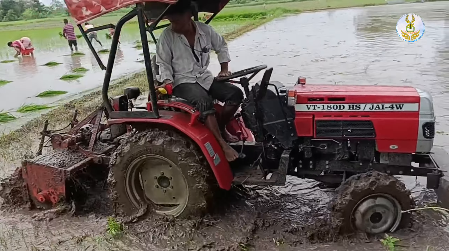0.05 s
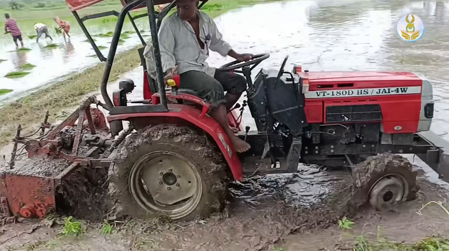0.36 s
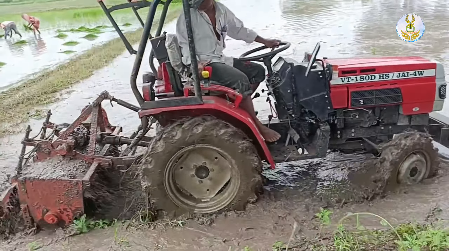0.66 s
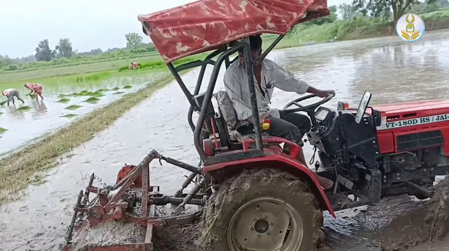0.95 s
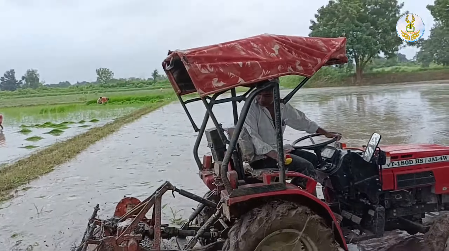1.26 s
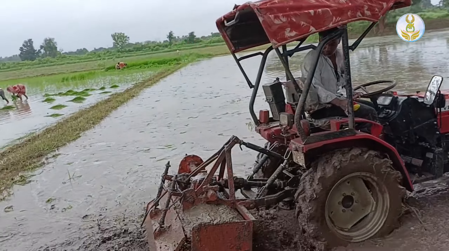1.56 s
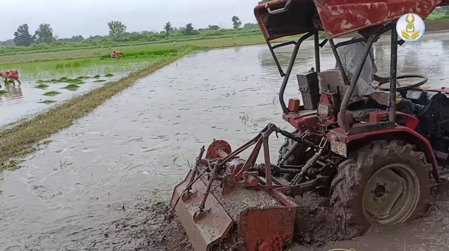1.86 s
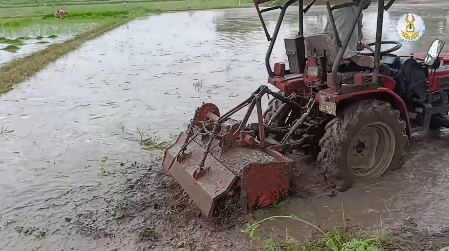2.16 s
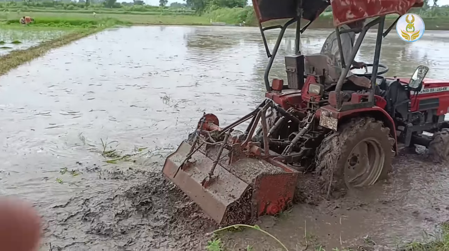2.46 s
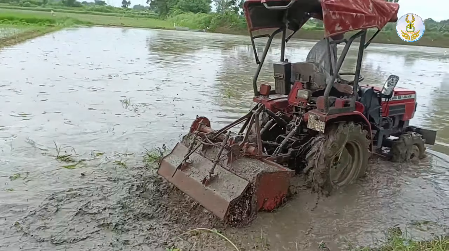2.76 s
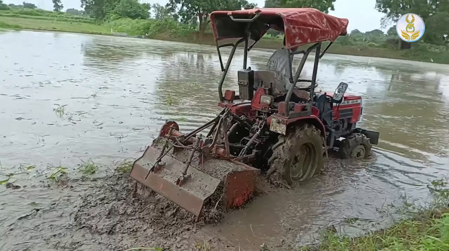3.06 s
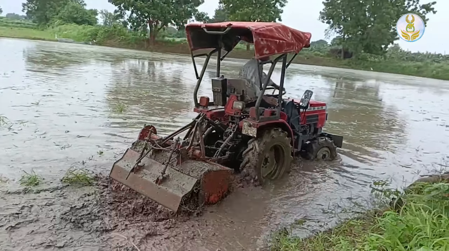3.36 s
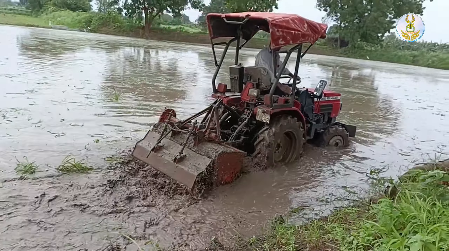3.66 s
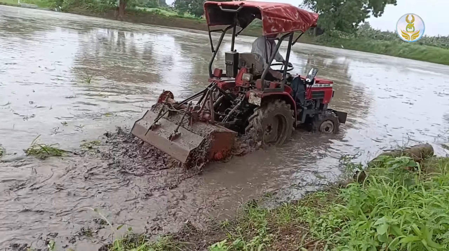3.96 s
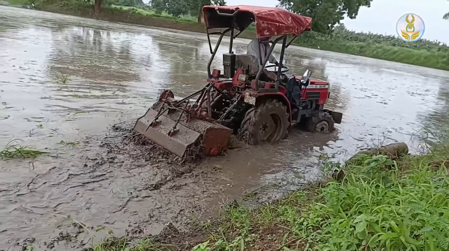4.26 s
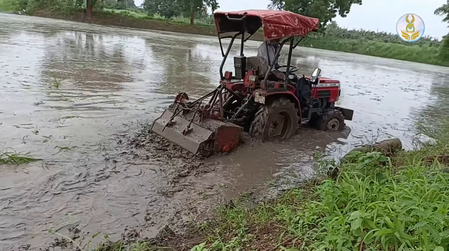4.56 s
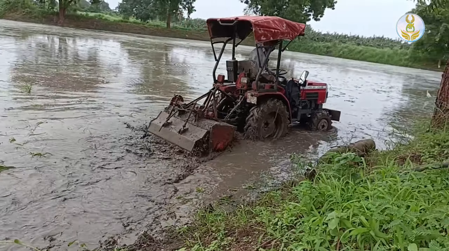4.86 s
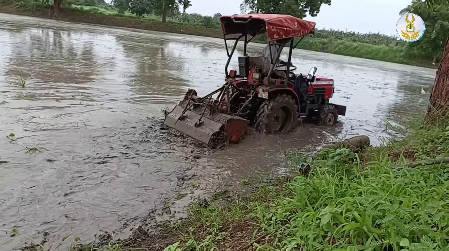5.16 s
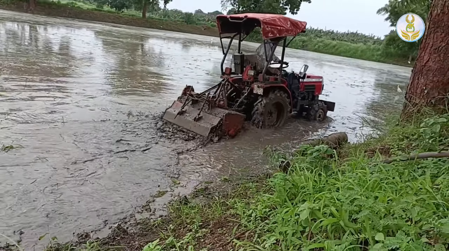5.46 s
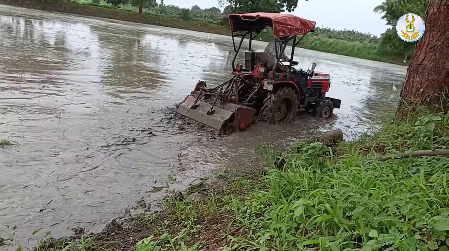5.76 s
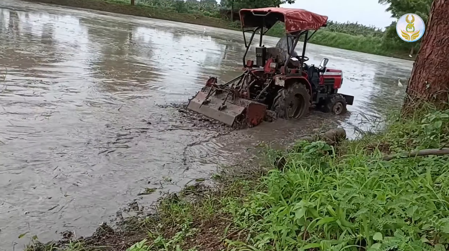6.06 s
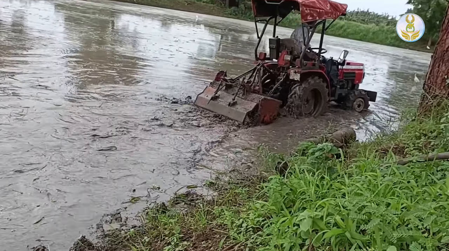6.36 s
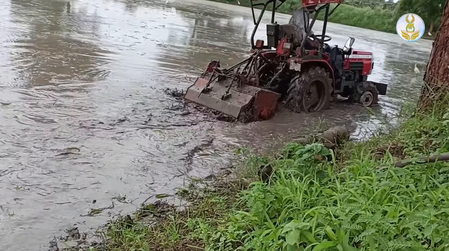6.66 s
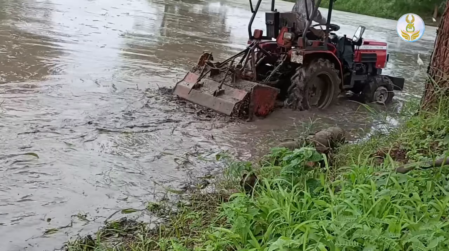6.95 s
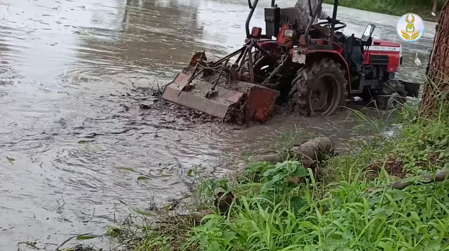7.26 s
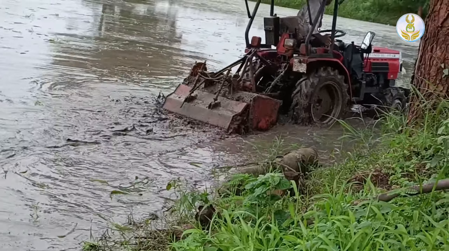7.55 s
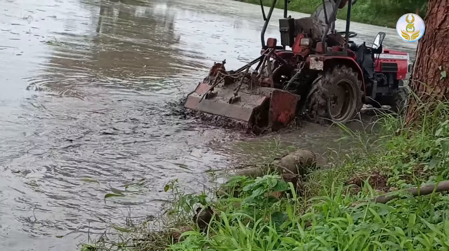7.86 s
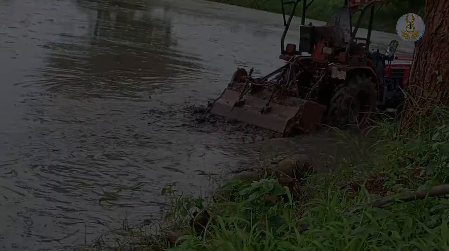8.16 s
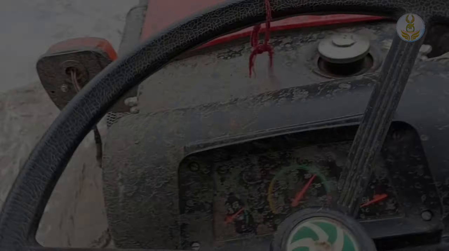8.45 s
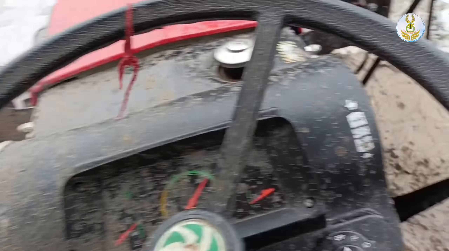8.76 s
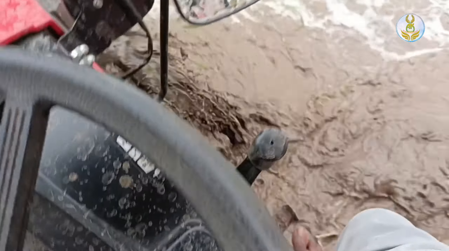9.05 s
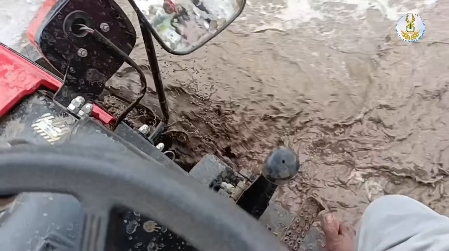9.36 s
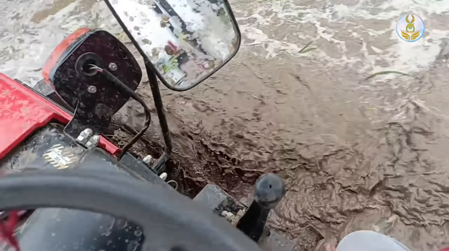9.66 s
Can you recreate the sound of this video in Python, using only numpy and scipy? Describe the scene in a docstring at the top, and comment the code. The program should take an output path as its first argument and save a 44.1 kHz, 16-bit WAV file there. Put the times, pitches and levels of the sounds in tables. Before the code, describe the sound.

A small diesel tractor chugs through wet mud pulling a tiller and moves away, then its engine runs louder and faster up close.

```python
"""A small diesel tractor drags a rotary tiller through a flooded field, passes close by and moves away. Its
exhaust thumps unevenly under load, each puff ringing the pipe and silencer over the engine's clatter. The
blades churn mud and fling grit against their hood, narrow bands of noise swell and fade, and light gusts
rumble. Then the scene changes to the driver's seat, where the engine runs faster, the bonnet drones and the
valves tick."""
import sys
import numpy as np
from scipy import signal
from scipy.fft import rfft, irfft, next_fast_len
from scipy.io import wavfile
from scipy.ndimage import uniform_filter1d, minimum_filter1d, map_coordinates

SR = 44100
rng = np.random.default_rng(int(sys.argv[2]) if len(sys.argv) > 2 else 0)


def put_to_file(sound):
    """Save the sound as 16-bit audio at rate SR, in the file named by the first command-line argument."""
    columns = np.atleast_2d(sound).T  # one column per channel
    safe = np.clip(columns, -1, 1)
    whole_steps = np.round(safe * 32767)
    wavfile.write(sys.argv[1], SR, whole_steps.astype(np.int16))


N = 433062
T = np.arange(N) / SR

FIELD_END_S, SEAT_START_S = 8.342, 8.410
PASS_S, PASS_M, DRIVE_M_PER_S = 0.55, 2.78, 1.0  # closest point of a straight drive past
TURN_START_S, TURN_END_S = 2.9, 5.04  # the tractor turns its tail to us
BEHIND_BANK_S = 6.94  # from here on it slips behind the grassy bank

# Stereo width. Each row: frequency in Hz, left-right likeness from -1 to 1.
STEREO_LIKENESS = [(30, -0.5), (100, 1), (300, 0.58), (600, 0.86), (1100, 0.37), (2200, 0), (5000, 0)]
# Stereo lean on the bank and at the seat. Each row: frequency in Hz, left minus right in dB.
FIELD_LEAN = [(60, 2), (250, 0), (1800, -2.5), (3600, -6), (6400, -2), (8500, 14.5), (10500, -0.5),
              (12500, -4), (15000, -13)]
SEAT_LEAN = [(300, 0), (2700, -1.5), (4200, 3), (6400, 17), (9800, 16), (15000, 2)]
# How each named part carries. Each row: metres behind the engine, base level at the closest point in dB,
# dB lost per doubling of distance, dB gained from behind, dB lost per second behind the bank.
PART_CARRY = {"pipe": (-0.5, -17.5, 3.5, 0, 0.5), "silencer": (0, -17.5, 6, -1, -2),
              "clatter": (1, -25.5, 3.5, 1, 3.5), "slosh": (-0.4, -20.5, 1.5, -12.5, 0.5),
              "spray": (1.6, -30.5, 3.5, -5, 0.5), "hood": (0, -35, 4, 8.5, 6)}

# Colours of the noise layers. Each row: frequency in Hz, relative level in dB.
WIND_SPECTRUM = [(10, -6), (36, -10), (80, -1.5), (250, -11.5), (1500, -95)]
SLOSH_SPECTRUM = [(500, -3), (1200, -6), (1750, -1.5), (2100, -0.5), (2700, -0.5), (3300, 1.5),
                  (4000, -0.5), (4600, -6.5), (5500, -8.5), (6300, -19.5), (7100, -26), (10000, -58)]
SPRAY_SPECTRUM = [(4000, -12), (6000, -1.5), (7100, -8.5), (7700, -3), (9500, -2.5), (10400, -5),
                  (11500, -1), (13000, -2.5), (14500, -6.5), (16000, -8)]
CLATTER_SPECTRUM = [(200, -12), (350, -12), (410, -26), (465, -1), (540, 2.5), (700, 4), (820, -0.5),
                    (1000, 0), (1450, -2.5), (2000, -14.5), (9000, -69)]
SEAT_KNOCK_SPECTRUM = [(25, -1), (70, -4), (180, 5.5), (360, 9.5), (570, -1), (690, 3.5), (800, 0.5),
                       (900, 3.5), (1000, -3), (1250, 0), (1550, -6.5), (1900, 1.5), (2800, -4),
                       (3600, -19), (7000, -71)]
SEAT_TREBLE_SPECTRUM = [(1650, -15.5), (2800, -5.5), (3300, -2.5), (3700, -7.5), (5500, -12.5),
                        (6950, -20.5), (7800, -16), (12200, -24), (15500, -36)]

# Gusts on the microphone. Each row: peak time in seconds, swell time in seconds, level in dB.
WIND_GUSTS = [(0.1, 0.61, -19.5), (1.6, 2.5, -23), (7.33, 0.068, -19.5), (8.1, .06, -21)]
# Narrow bands of noise. Each row: peak time and swell time in seconds, centre and nominal width in Hz,
# level in dB.
RESONANT_BANDS = [(0, 1.8, 1123, 59, -28.5), (5, 0.3, 319, 9.6, -21), (6, 1.1, 332, 27, -31.5),
                  (4, 0.83, 1725, 100, -35.5)]
# Level rides. Each row: peak time in seconds, swell time in seconds, boost or cut in dB.
SPRAY_SWELLS = [(1.65, .35, 2), (3.3, .25, 2.5), (3.8, .2, -2.5)]  # the blades throw up more spray, or less
LOAD_SWELLS = [(0.45, 0.6, 4), (3.2, 0.92, -3.5), (4.6, 0.25, 2)]  # the silencer swells as the engine labours and sinks as it eases

# Grit and clods on the tiller. Each row: start in seconds, relative level in dB, centre in Hz,
# seconds to fade by 60 dB.
GRIT_HITS = [(0.263, -6, 1000, .07), (0.486, -6, 800, .07), (1.256, -5, 1600, .05), (1.737, -10, 3400, .04),
             (2.236, -6.5, 4500, .04), (2.514, -4, 7000, .04), (2.638, -9, 7500, .04),
             (2.719, -10, 6500, .03), (3.160, -7, 3100, .05), (3.309, -11, 6500, .03),
             (3.637, -7, 3000, .03), (3.916, -4, 2600, .06), (3.955, -9.5, 2600, .05),
             (4.515, -13, 5500, .04), (4.577, -10, 6500, .04), (5.950, -12, 5500, .03),
             (6.812, -19, 6000, .03), (8.241, -7.5, 560, .08)]
# The tiller's struck steel. Each row: pitch in Hz, level in dB, seconds to fade by 60 dB.
STEEL_MODES = [(720, -14, .07), (1170, -5, .08), (1290, -10, .08), (1620, -11, .07), (2280, -10, .07)]
# Ringing parts. Each row: centre in Hz, nominal width in Hz, relative level in dB.
TILLER_HOOD_MODES = [(2178, 490, 7.5), (3750, 740, -2.5), (5080, 630, -4)]
VALVE_MODES = [(5400, 420, -1), (7900, 210, -5), (8530, 280, -3.5), (9400, 180, -1.5)]
PIPE_MODES = [(85.8, 8.4, 12.5), (122.6, 27, 3), (167.2, 22, 4.5)]
SILENCER_MODES = [(222, 58, 0), (244.6, 24, 8), (295.7, 13.5, 6), (307, 15, -4)]

# Engine speed as the governor hunts under load. Each row: time in seconds, firings per second.
FIELD_FIRING_RATE = [(0, 42.2), (0.4, 41.9), (0.85, 41.8), (1.65, 41.9), (2.2, 43.0), (2.7, 41.9),
                     (3.5, 42.0), (4, 41.4), (4.45, 42.0), (4.9, 40.3), (5.4, 41.1), (5.95, 42.3),
                     (6.45, 41.4), (7.1, 41.9), (7.7, 40.7), (8.1, 42.7)]
SEAT_FIRING_RATE = [(8.45, 51.61), (8.62, 50.93), (8.83, 52.0), (9.03, 51.04), (9.2, 51.58), (9.46, 51.26),
                    (9.6, 51.68)]
# The engine's tones. Each row: multiple of the firing rate, relative level in dB.
PIPE_ORDERS = [(1, -18), (2, -9), (3, 0), (4, -4.5)]
SILENCER_ORDERS = [(5, -13), (5.5, -11), (6, -5), (7, 0), (8, -12)]
THROB_ORDERS = [(1, -5), (2, 0), (3, 0)]
BONNET_ORDERS = [(4, -13), (4.35, -11.5), (5, -15), (6, 0), (6.935, -10.5), (7, -7), (8, -14), (8.45, -19),
                 (9, -20), (13.7, -20), (17.07, -18.5), (17.6, -24)]


def amp(db):
    """Decibels to gain."""
    return 10 ** (np.asarray(db) / 20)


def unit(x):
    """Scale to rms 1."""
    return x / np.sqrt(np.mean(x ** 2) + 1e-20)


def along(points, hz):
    """Read a curve of (Hz, value) points on a log frequency axis."""
    freqs, values = np.transpose(points)
    return np.interp(np.log(hz + 1), np.log(freqs + 1), values)


def swell(peak_s, swell_s):
    """A smooth rise to 1 at peak_s and fall back to 0."""
    return np.exp(-((T - peak_s) / swell_s) ** 2)


def ride_db(swells):
    """A fader move in dB, built from smooth boosts and cuts."""
    return sum(db * swell(peak_s, swell_s) for peak_s, swell_s, db in swells)


def wobble(rate):
    """A smooth random curve, rate knots a second."""
    knots = rng.standard_normal(4096)
    coarse_s = T[::32]
    return np.interp(T, coarse_s, map_coordinates(knots, [coarse_s * rate], mode="wrap"))


def blend(clean, rough, share):
    """Equal-power crossfade; share is the rough signal's part."""
    share = np.clip(share, 0, 1)
    return np.sqrt(1 - share) * clean + np.sqrt(share) * rough


def filtered(x, response):
    """Filter x by a complex response of frequency."""
    size = next_fast_len(N + SR // 4)
    return irfft(rfft(x, size) * response(np.fft.rfftfreq(size, 1 / SR)), size)[..., :N]


def ringing(modes, hz):
    """Causal response of a set of resonances."""
    return sum(amp(db) * 1j * hz * width / (centre ** 2 - hz ** 2 + 1j * hz * width)
               for centre, width, db in modes)


def band(centre_hz, width_hz, hz):
    """A steeper band-pass: the same resonance twice over."""
    return ringing([(centre_hz, width_hz, 0)], hz) ** 2


def stereo_noise(colour, envelope=1):
    """Enveloped, filtered noise with a mid of rms 1: narrow near 100 Hz, wide in the treble."""
    def response(hz):
        angle = np.arccos(np.clip(along(STEREO_LIKENESS, hz), -1, 1)) / 2
        return colour(hz) * np.array([np.cos(angle), np.sin(angle)])
    mid, side = filtered(envelope * rng.standard_normal((2, N)), response)
    return np.array([mid + side, mid - side]) / np.std(mid)


def rush(spectrum, envelope=1):
    """Stereo noise coloured by a spectrum table."""
    return stereo_noise(lambda hz: amp(along(spectrum, hz)), envelope)


def count_firings(firing_rate):
    """The engine's phase as a running count of firings."""
    times, rates = np.transpose(firing_rate)
    return np.cumsum(np.interp(T, times, rates)) / SR


def beats(cycles, scatter_db, jitter_s):
    """One impulse per whole cycle, uneven in size and timing."""
    at = np.flatnonzero(np.diff(np.floor(cycles)))
    size, shift = rng.standard_normal((4096, 2))[:len(at)].T
    at = np.clip(at + np.round(shift * jitter_s * SR).astype(int), 0, N - 1)
    return np.bincount(at, amp(scatter_db * np.minimum(size, 1.6)), N)


def drops(rate, scatter_db):
    """Impulses of uneven size at random moments, about rate a second."""
    return (rng.random(N) < rate / SR) * amp(scatter_db * np.minimum(rng.standard_normal(N), 2))


def bursts(hits, life_s, share):
    """Envelope of mean power 1: decaying hits carry their share, over a steady bed."""
    power = signal.lfilter([1], [1, -np.exp(-1 / (life_s * SR))], hits ** 2)
    return np.sqrt(1 - share + share * power / power.mean())


def hum(firings, orders, waver_db, drift_rad, rate):
    """Engine orders, each wavering a little in level and phase."""
    tones = np.zeros(N)
    for order, db in orders:
        gain = amp(db + waver_db * wobble(rate))
        tones -= gain * np.cos(2 * np.pi * order * firings + drift_rad * wobble(rate))
    return unit(tones)


def arriving(x, lead_s):
    """Pan by delay: the left side hears it lead_s before the right."""
    return np.array([np.interp(T + side * lead_s / 2, T, x) for side in (1, -1)])


def ports(x, lean):
    """The two microphone ports face different ways, so each has its own colour."""
    def response(hz):
        gains = amp(np.outer([1, -1], along(lean, hz)) / 2)
        return gains / np.sqrt(np.mean(gains ** 2, axis=0))
    return filtered(x, response)


def turned_away():
    """0 while the tractor is side-on and near, 1 once it is heard from behind and afar."""
    return np.clip((T - TURN_START_S) / (TURN_END_S - TURN_START_S), 0, 1)


def heard_db(part):
    """Level of one part of the tractor, from its distance, its heading and the bank in between."""
    trail_m, close_db, doubling_db, behind_db, bank_db_per_s = PART_CARRY[part]
    distance_m = np.hypot(PASS_M, DRIVE_M_PER_S * (T - PASS_S) - trail_m)
    screened_db = bank_db_per_s * np.maximum(T - BEHIND_BANK_S, 0)
    return close_db - doubling_db * np.log2(distance_m / PASS_M) + behind_db * turned_away() - screened_db


def noise_bed():
    """A very faint, dark hiss under everything."""
    return amp(-72) * rush([(30, -1), (300, -11), (3000, -25), (15000, -37.5)])


def wind():
    """A few light gusts rumble on the microphone."""
    gusts = sum(amp(db) * swell(peak_s, swell_s) for peak_s, swell_s, db in WIND_GUSTS)
    return gusts * rush(WIND_SPECTRUM)


def resonant_bands():
    """Narrow bands of noise swell and fade; the two lowest overlap into a slightly rising hum."""
    bands = np.zeros((2, N))
    for peak_s, swell_s, centre_hz, width_hz, db in RESONANT_BANDS:
        ring = stereo_noise(lambda hz: band(centre_hz, 2 * width_hz, hz))
        bands += amp(db) * swell(peak_s, swell_s) * ring
    return bands


def grit():
    """Grit ticks and clods thud on the tiller, each a short noise burst in its own band."""
    track = np.zeros((2, N + SR))
    t = np.arange(SR // 5) / SR
    hz = np.fft.rfftfreq(len(t), 1 / SR)
    for start_s, db, centre_hz, t60 in GRIT_HITS:
        noise = rng.standard_normal((2, len(t)))
        grain = unit(irfft(rfft(noise) * band(centre_hz, 1.08 * centre_hz, hz), len(t)))
        start = round(start_s * SR)
        track[:, start:start + len(t)] += amp(db - 6.5 - 60 * t / t60) * grain
    return track[:, :N]


def stone_clank(start_s=1.256):
    """One hard blow from a stone rings the tiller's steel."""
    t = np.maximum(T - start_s, 0)
    return sum(amp(db - 60 * t / t60) * np.sin(2 * np.pi * hz * t) for hz, db, t60 in STEEL_MODES)


def tiller():
    """Blades slap the mud into slosh and fine spray; the hood's ring comes forward from behind."""
    def hood_colour(hz):
        return sum(amp(db) * band(centre, width, hz) for centre, width, db in TILLER_HOOD_MODES)
    slaps = bursts(drops(rate=110, scatter_db=4.0), life_s=0.008, share=0.42)
    splatter = bursts(drops(rate=830, scatter_db=-1.5), life_s=0.00044, share=0.23)
    slosh = rush(SLOSH_SPECTRUM, slaps * splatter)
    droplets = bursts(drops(rate=610, scatter_db=5.0), life_s=0.00045, share=0.057)
    spray = rush(SPRAY_SPECTRUM, slaps * droplets)
    hood = stereo_noise(hood_colour, slaps)
    spray_db = heard_db("spray") + ride_db(SPRAY_SWELLS)
    return amp(heard_db("slosh")) * slosh + amp(spray_db) * spray + amp(heard_db("hood")) * hood


def clatter(firings):
    """Combustion knock and the tiller's rattling drive, dulling as the tractor turns away."""
    hits = beats(firings, scatter_db=3.5, jitter_s=0.0025) + drops(rate=110, scatter_db=2.5)
    bright = rush(CLATTER_SPECTRUM, bursts(hits, life_s=0.008, share=0.51))
    dull = unit(filtered(bright, lambda hz: 1 / np.sqrt(1 + (hz / 820) ** 6)))
    dulled = 0.74 * turned_away()
    buildup = np.sqrt(1 + 2 * np.sqrt(dulled * (1 - dulled)))  # related signals add up louder
    return amp(heard_db("clatter")) * blend(bright, dull, dulled) / buildup


def seat_rattle(firings):
    """The engine's hard edge up close: a knock at every firing and ticking, ringing valve gear."""
    pulses = bursts(beats(firings, scatter_db=3.0, jitter_s=0.00063), life_s=0.0021, share=0.3)
    knocks = pulses * bursts(drops(rate=320, scatter_db=2.5), life_s=0.0033, share=0.13)
    ticks = bursts(drops(rate=51, scatter_db=10.0), life_s=0.01, share=0.36)
    valves = stereo_noise(lambda hz: ringing(VALVE_MODES, hz), ticks)
    body = rush(SEAT_KNOCK_SPECTRUM, knocks)
    treble = rush(SEAT_TREBLE_SPECTRUM, knocks)
    return amp(6.0) * body + amp(-6.5) * treble + amp(-16.5) * valves


def seat_drone(firings):
    """The engine's firm throb and the droning bonnet, both following the firing rate."""
    throb = amp(-13.5) * hum(firings, THROB_ORDERS, waver_db=-0.1, drift_rad=0.08, rate=2.3)
    bonnet = amp(-9) * hum(firings, BONNET_ORDERS, waver_db=2.2, drift_rad=0.22, rate=12)
    return arriving(throb + bonnet, lead_s=0.00016)


def exhaust(firings):
    """Steady firing tones, and ragged puffs that ring the pipe and silencer; more ragged from afar."""
    def muffle(hz):
        return 1 / np.sqrt((1 + (hz / 372) ** 20) * (1 + (45 / (hz + 1)) ** 6))
    far = turned_away()
    surges = beats(3 * firings, scatter_db=5, jitter_s=0.0016)
    thumps = beats(firings + 0.45 * wobble(16), scatter_db=2, jitter_s=0.002)
    puffs = -(thumps + 0.4 * surges)
    chug = bursts(puffs, life_s=0.009, share=0.45)
    pipe_ring = unit(filtered(puffs, lambda hz: ringing(PIPE_MODES, hz) * muffle(hz)))
    silencer_ring = unit(filtered(puffs, lambda hz: ringing(SILENCER_MODES, hz) * muffle(hz)))
    pipe_tone = hum(firings, PIPE_ORDERS, waver_db=1.5, drift_rad=0.55, rate=3)
    silencer_tone = chug * hum(firings, SILENCER_ORDERS, waver_db=-0.5, drift_rad=0.8, rate=3)
    pipe = blend(pipe_tone, pipe_ring, share=0.37)
    silencer = blend(silencer_tone, silencer_ring, share=0.21 + 0.41 * far)
    pipe_db = heard_db("pipe")
    silencer_db = heard_db("silencer") + ride_db(LOAD_SWELLS)
    direct = amp(pipe_db) * pipe + amp(silencer_db) * silencer
    # sound scattered by the bank widens the image
    scattered = rush([(25, -9), (70, 7), (330, 1), (450, -11.5), (1500, -86)], chug)
    return arriving(direct, lead_s=-0.0002 + 0.00018 * far) + amp(pipe_db - 6) * scattered


def tractor_from_seat(fade_db=15.5, fade_s=0.23):
    """The engine from the driver's seat, fading quickly up to full level."""
    firings = count_firings(SEAT_FIRING_RATE)
    engine = seat_drone(firings) + amp(-21) * seat_rattle(firings)
    fade_in = amp(-fade_db * np.clip(1 - (T - SEAT_START_S) / fade_s, 0, 1))
    return fade_in * ports(engine, SEAT_LEAN)


def tractor_from_bank():
    """The working tractor drives past the bank in a light wind."""
    firings = count_firings(FIELD_FIRING_RATE)
    tractor = exhaust(firings) + clatter(firings) + tiller() + resonant_bands() + grit() + stone_clank()
    return ports(tractor + wind(), FIELD_LEAN)


def scene():
    """The pass-by from the bank, then the scene changes to the driver's seat."""
    on_bank = np.clip((FIELD_END_S - T) / 0.0068, 0, 1)
    aboard = np.clip((T - SEAT_START_S) / 0.0059, 0, 1)
    return on_bank * tractor_from_bank() + aboard * tractor_from_seat() + noise_bed()


def record(dry):
    """A fast limiter holds the peaks down, then a brick-wall filter trims the very top."""
    ceiling, top_hz = 0.88, 15800
    needed = np.minimum(1, ceiling / (np.abs(dry).max(axis=0) + 1e-9))
    gain = uniform_filter1d(minimum_filter1d(needed, size=257), size=257)
    return filtered(dry * gain, lambda hz: hz < top_hz)


dry = scene()
out = record(dry)
put_to_file(out)
```